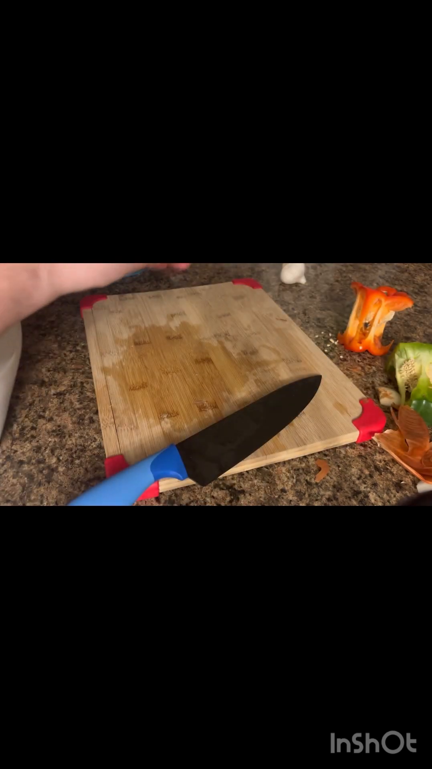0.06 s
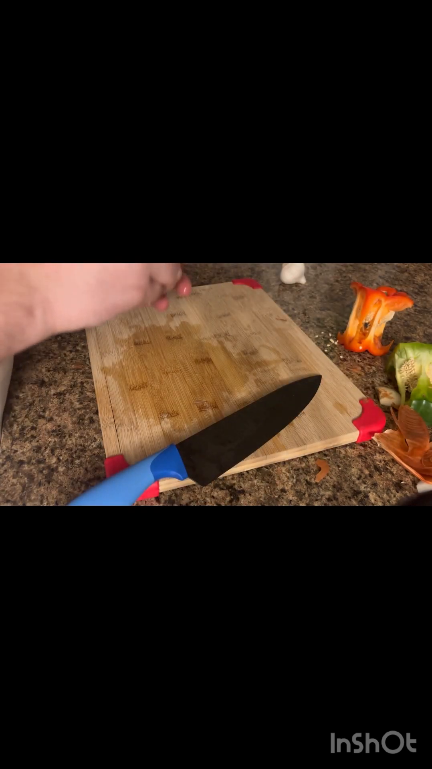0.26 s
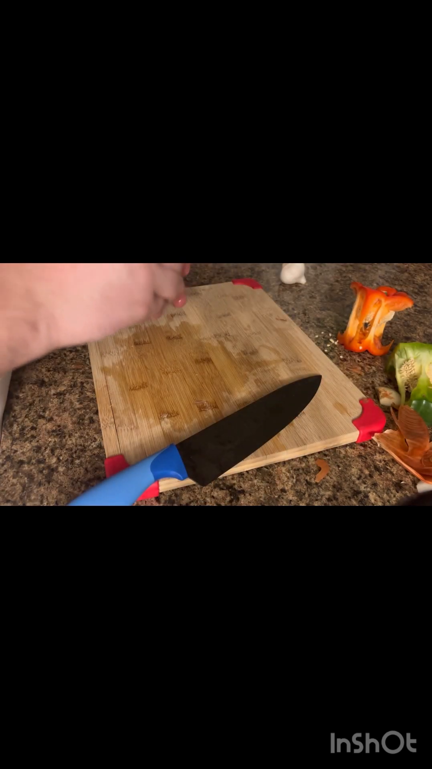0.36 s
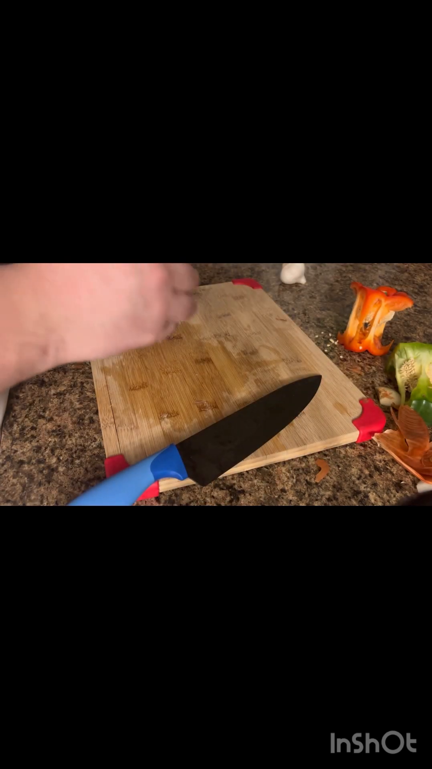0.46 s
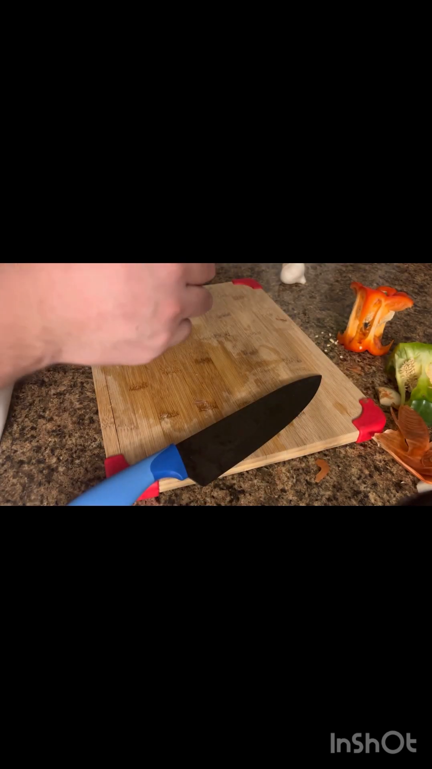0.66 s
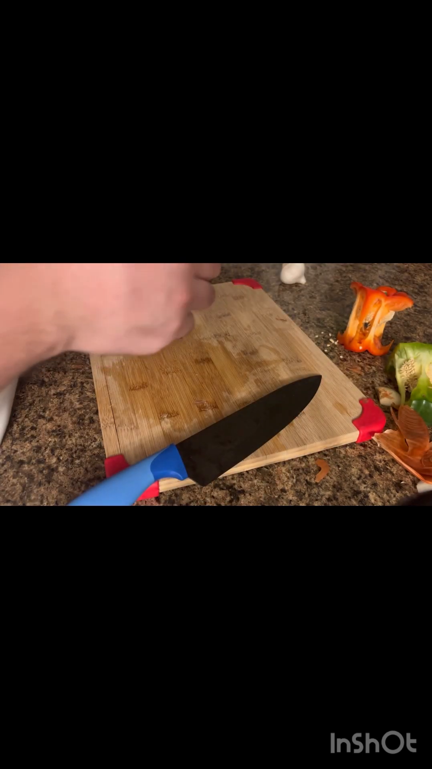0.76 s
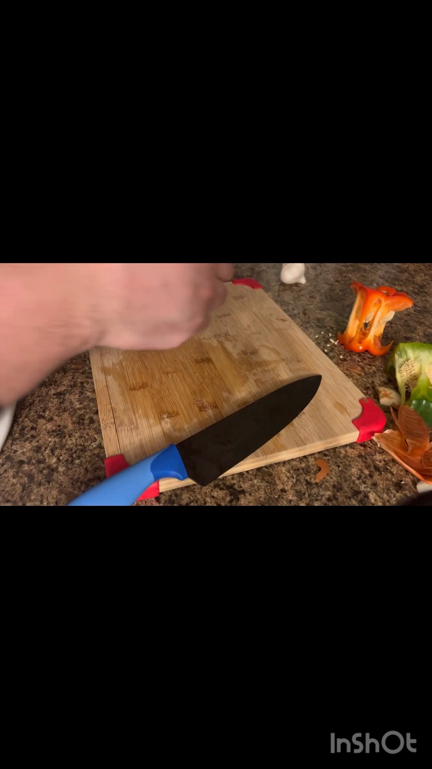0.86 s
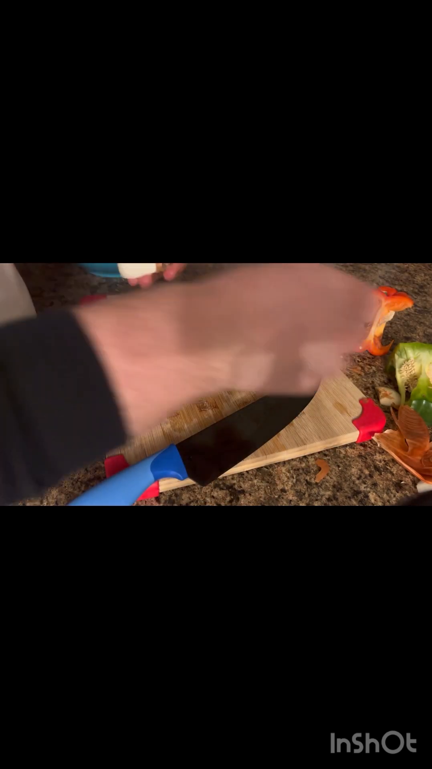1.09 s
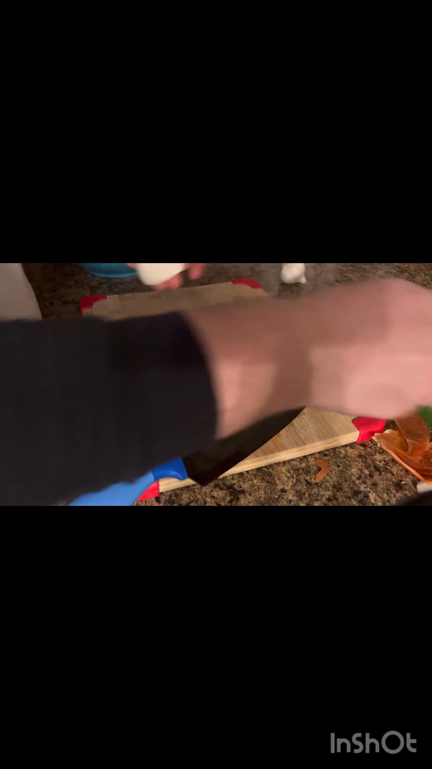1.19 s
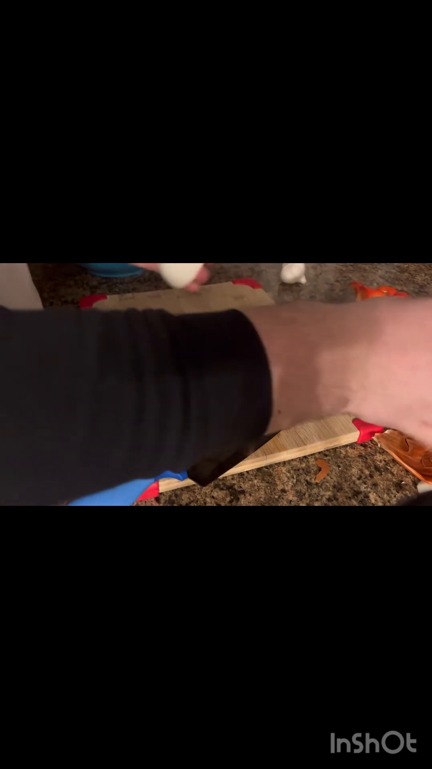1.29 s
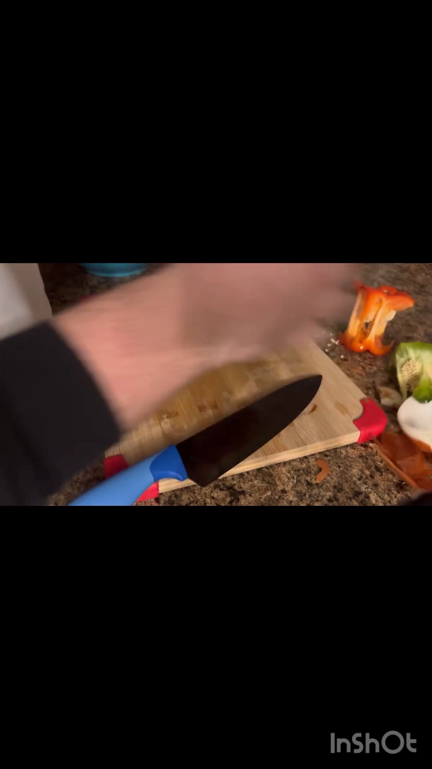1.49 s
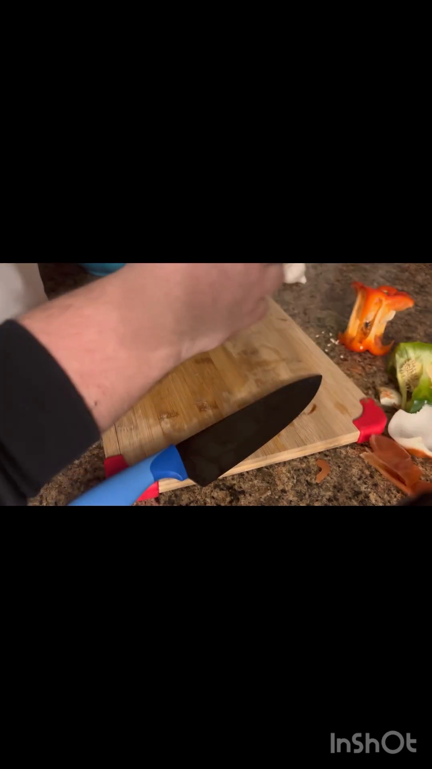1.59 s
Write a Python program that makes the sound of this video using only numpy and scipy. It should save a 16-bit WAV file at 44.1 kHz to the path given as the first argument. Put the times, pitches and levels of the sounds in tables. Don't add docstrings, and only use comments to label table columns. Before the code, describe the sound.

Papery onion skin is peeled by hand, close to a phone's stereo microphones. Faint crackles start; from 0.2 to 0.55 s loose dry skin rattles brightly, with wooden board knocks around 0.2-0.37 s. Rustling thins, snaps cluster near 0.75 s, and a sharp rip comes at 0.95 s. Smaller snaps follow, a soft palm thud at 1.3 s, and a last tick near 1.63 s over low fridge hum.

```python
import sys
import numpy as np
from scipy import signal
from scipy.fft import rfft, irfft, next_fast_len
from scipy.io import wavfile
from scipy.ndimage import uniform_filter1d, map_coordinates

SR = 44100
rng = np.random.default_rng(int(sys.argv[2]) if len(sys.argv) > 2 else 0)


def master_out(mix):
    frames = np.transpose(np.atleast_2d(mix))
    ceiling = np.clip(frames, -1, 1)
    pcm = np.round(ceiling * 32767).astype(np.int16)
    wavfile.write(sys.argv[1], SR, pcm)


def voltage_ratio(level):
    return 10 ** (np.asarray(level, float) / 20)


N = 72765

# (frequency [Hz], level [dB])
PORT_DIFFERENCE = [(100, -28), (350, -6), (1500, -8), (3000, -9), (6000, -9), (8500, -13), (12000, -18),
                   (15000, -12)]


def unit(x):
    return x / np.sqrt(np.mean(x ** 2) + 1e-20)


def along(points, hz):
    f, v = np.transpose(points)
    return np.interp(np.log(hz + 1), np.log(f + 1), v)


def wobble(rate_hz):
    knots = rng.standard_normal(int(N * rate_hz / SR) + 4)
    return map_coordinates(knots, [np.arange(N) * rate_hz / SR])


def filtered(x, response):
    m = next_fast_len(N + SR // 2)
    return irfft(rfft(x, m) * response(np.fft.rfftfreq(m, 1 / SR)), m)[..., :N]


def coloured(x, spectrum):
    gain = lambda hz: voltage_ratio(along(spectrum, hz))
    rms_gain = np.sqrt(np.mean(gain(np.linspace(0, SR / 2, 500)) ** 2))
    return filtered(x, lambda hz: gain(hz) / rms_gain)


def add(out, s, sound):
    part = out[round(s * SR):][:len(sound)]
    part += sound[:len(part)]


def ticks(rate_hz, spread_db):
    chance, sign, size = rng.random((3, N))
    return unit((chance < rate_hz / SR) * np.sign(sign - .5) * voltage_ratio(-spread_db * np.log(size + .03)))


def snapping():
    # (time [s], peak level [dB], t60 [s], lowest frequency [Hz])
    snaps = [(0.04, -59, 0.015, 5020), (0.055, -44, 0.012, 5030), (0.082, -41, 0.019, 5000),
             (0.1165, -42, 0.019, 2400), (0.1046, -44, 0.012, 5000), (0.163, -44, .01, 5030),
             (0.2268, -25, .01, 600), (.288, -41, 0.0085, 5500), (0.312, -28, 0.014, 5400),
             (0.499, -35, 0.017, 5000), (0.5303, -42, 0.012, 5960), (0.66, -43, .015, 5000),
             (0.651, -44.5, 0.08, 5030), (0.729, -43, 0.013, 2870), (.737, -38, 0.007, 6000),
             (0.741, -27.5, 0.014, 6030), (0.7534, -23, 0.0058, 5130), (0.782, -45, 0.052, 5030),
             (.762, -47, 0.014, 2800), (0.796, -36.5, 0.047, 5200), (0.8688, -34, 0.025, 7000),
             (.8785, -46, 0.012, 2580), (0.887, -35.5, 0.048, 2600), (0.9033, -38.5, 0.019, 2460),
             (0.9163, -35, 0.013, 8060), (0.922, -35, .01, 1500), (1.0916, -42, 0.0071, 6000),
             (1.0969, -31.5, 0.0042, 3030), (1.1215, -41, .01, 6000), (1.1265, -30, 0.01, 8550),
             (1.1634, -33, 0.022, 1820), (1.177, -36.5, 0.044, 4900), (1.198, -38, 0.024, 6040),
             (1.297, -38, 0.036, 700), (1.303, -37, 0.026, 6200), (1.3281, -27, 0.013, 890),
             (1.329, -37, .02, 6000), (1.3474, -35.5, 0.014, 2800), (1.3785, -35, 0.01, 1900),
             (1.396, -39, 0.014, 3980), (1.404, -39.5, 0.075, 1200), (1.627, -32, 0.012, 600)]
    # (time [s], peak level [dB])
    rip = [
        (.9532, -33),
        (.9572, -26),
        (.9594, -26),
        (.9624, -28),
        (.9660, -30),
        (.9700, -28),
        (.9730, -35),
        (.9779, -38),
        (.9841, -41),
    ]
    rip_t60_s, rip_low_hz, rip_body_hz, rip_body_db = .014, 2700, 700, 1
    rise_s, spike_db, spike_t60_s, span_ratio = 0.00037, 2.5, .004, 5.5
    events = list(snaps)
    for s, db in rip:
        events.append((s, db, rip_t60_s, rip_low_hz))
        events.append((s, db + rip_body_db, rip_t60_s, rip_body_hz))
    out, t = np.zeros(N), np.arange(SR // 10) / SR
    for s, db, t60_s, low_hz in events:
        tail = voltage_ratio(db - 60 * t / max(t60_s, .002))
        spike = voltage_ratio(db + spike_db - 60 * t / spike_t60_s)
        snap = (tail + spike) * (1 - np.exp(-t / rise_s)) * rng.standard_normal(len(t))
        band_hz = [low_hz, min(low_hz * span_ratio, SR / 2.1)]
        sos = signal.butter(2, band_hz, 'band', fs=SR, output='sos')
        add(out, s, signal.sosfilt(sos, snap))
    return out


def tearing():
    # (time [s], level [dB], length [s])
    tears = [
        (0.951, -46, 0.0032),
        (0.959, -36.5, 0.015),
        (1.331, -41.5, 0.0079),
        (1.342, -44.5, 0.0099),
        (0.306, -33.5, 0.016),
        (0.341, -36, 0.042),
        (.283, -39, .012),
    ]
    release_s = .004
    envelope, t = np.zeros(N), np.arange(SR // 10) / SR
    for s, db, length_s in tears:
        add(envelope, s, voltage_ratio(db) * np.exp(-np.clip(t - length_s, 0, 1) / release_s))
    return envelope * voltage_ratio(1.5 * wobble(300)) * ticks(3500, spread_db=2)


def crackling(effort_db):
    level_db = effort_db + 5 + 2.5 * wobble(58.87)
    burst = voltage_ratio(-60 * np.arange(200) / SR / 0.0067) * rng.standard_normal(200)
    crackle = ticks(2600, spread_db=5) * voltage_ratio(level_db)
    return np.convolve(crackle, burst / np.linalg.norm(burst))[:N]


def skin():
    # (time [s], effort level [dB])
    peeling = [(0, -74.5), (.04, -64.5), (.27, -53.5), (.31, -53.5), (.385, -58), (.4, -50), (.56, -54.5),
               (.6, -68.5), (.72, -62), (.75, -56), (.86, -62.5), (.88, -54.5), (1.0, -54.5), (1.07, -67),
               (1.19, -61), (1.28, -75.5), (1.38, -57.5), (1.56, -65)]
    # (frequency [Hz], level [dB])
    paper_colour = [(500, -2.5), (1000, -3), (2200, -4), (4000, -3.5), (5500, -10.5), (8000, 0.5),
                    (11000, -5), (15000, -2)]
    # (frequency [Hz], level [dB])
    rub_colour = [(700, 10), (2500, -3), (5500, -2.5), (8000, -1), (15000, -7)]
    let_go_s, let_go_db_per_s = 1.57, 299
    now = np.arange(N) / SR
    effort_db = np.interp(now, *np.transpose(peeling)) - let_go_db_per_s * np.clip(now - let_go_s, 0, 1)
    breaking = snapping() + tearing() + crackling(effort_db)
    rub = voltage_ratio(effort_db + 2 + 5.5 * wobble(25.29)) * rng.standard_normal(N)
    return coloured(breaking, paper_colour) + coloured(rub, rub_colour)


def shiver(clicks):
    loose_s, level_db, t60_s, centre_hz, width_hz = .26, -21, .05, 2250, 700
    envelope, t = np.zeros(N), np.arange(SR // 5) / SR
    for s, db, *_ in clicks:
        add(envelope, s, (s > loose_s) * voltage_ratio(db + level_db - 60 * t / t60_s))
    shell = lambda f: 1j * f * width_hz / (centre_hz ** 2 - f * f + 1j * f * width_hz)
    return envelope * unit(filtered(ticks(1500, spread_db=0), lambda f: shell(f) ** 2))


def rattle():
    # (time [s], peak level [dB], ring frequency [Hz], upper mode level [dB], crack level [dB])
    clicks = [(.2, -33, 2060, 2, 4), (.2066, -43.5, 2160, 13, 5), (.2146, -41, 2090, -4, 1),
              (.2251, -19, 2160, 4, 4), (.231, -39, 2260, 0.5, 11), (.2337, -30.5, 2350, -3.5, 6),
              (.249, -42, 1990, -6, -7), (.2575, -36, 1990, -6, -13), (0.2672, -36, 2300, -13, -2),
              (0.286, -22.5, 2030, -13, -3.5), (.2916, -28.5, 1920, -4, 3), (0.3028, -23.5, 1960, -1, -2),
              (.3099, -16.5, 2050, -6, -5), (.32, -21.5, 2200, -3, -3.5), (0.3319, -27, 2030, -6.5, 6.5),
              (.338, -32, 2000, -1, 8), (.3482, -35, 2260, 0, 4), (0.3595, -24, 2040, -7, 0),
              (0.3659, -19.5, 2430, -20, -13), (.3708, -31, 2180, -4, -9), (0.3756, -27, 2360, -6, 5.5),
              (0.3823, -30, 2330, 8, 12), (.3977, -39, 2120, -6, -8), (0.4175, -28.5, 2200, -4, -0.5),
              (.4262, -32, 2260, -13, 0), (.4333, -24, 2100, -12, 2), (0.4402, -25.5, 2550, -10, -5.5),
              (.4461, -26, 2250, -13, -5.5), (.4564, -36, 2200, -9, -2), (0.4654, -36.5, 2330, -6, 0),
              (0.4794, -40, 2240, -17, 9), (0.486, -29, 1780, -8, -4), (0.4936, -32, 2440, -6, -3),
              (0.503, -30.5, 2520, -1, -7), (0.5104, -32.5, 2430, -6, 4), (0.535, -41, 2400, -12, -11),
              (0.556, -34, 2350, -25, -9), (.5641, -48, 2500, -7, 5)]
    # (frequency [Hz], level [dB])
    crack_colour = [(600, -32), (1400, 2.5), (2200, 0.5), (4000, 0.5), (6000, -1.5), (8000, 6), (13000, -6),
                    (16000, 3.5)]
    shell_t60_s, attack_s, upper_ratio, upper_mode_db = 0.012, 0.00057, 1.578, -1.5
    crack_level_db, crack_t60_s = -4, 0.009
    ring, crack, t = np.zeros(N), np.zeros(N), np.arange(SR // 20) / SR
    for s, db, hz, upper_db, crack_db in clicks:
        fade = voltage_ratio(db - 60 * t / shell_t60_s) * (1 - np.exp(-t / attack_s))
        drift = np.cumsum(rng.standard_normal(len(t))) * .08
        upper_hz = hz * upper_ratio * (1 + 0.074 * (rng.random() - .5))
        low = np.sin(2 * np.pi * hz * t + drift)
        upper = np.sin(2 * np.pi * (upper_hz * t + rng.random()) + 2 * drift[::-1])
        add(ring, s, fade * (low + voltage_ratio(upper_mode_db + upper_db) * upper))
        crack_fade = voltage_ratio(db + crack_level_db + crack_db - 60 * t / crack_t60_s)
        add(crack, s, crack_fade * rng.standard_normal(len(t)))
    return ring + shiver(clicks) + coloured(crack, crack_colour)


def board():
    # (time [s], level [dB], pitch factor, decay factor)
    knocks = [(0.197, -35, 0.82, 0.33), (0.21, -32, 3.26, 0.08), (0.2529, -25, 3.5, 0.039),
              (0.2579, -30, 3.35, 0.059), (.263, -34, 2.7, 0.062), (0.2694, -23, 1.0, 0.87),
              (.282, -27.5, 0.45, 0.38), (0.2828, -26, 0.94, 0.17), (.365, -37, 1, 0.47),
              (0.681, -33.5, 0.57, 0.55), (0.714, -40.5, 0.812, 0.36), (1.345, -29.5, 0.78, 0.16),
              (1.509, -46, 0.63, 0.41), (1.553, -45.5, 0.75, .4), (1.627, -32, 3.2, 0.021)]
    # (frequency [Hz], level [dB], t60 [s])
    modes = [(158.8, -2, 0.18), (156.1, -5, 0.655), (225.2, -7, 0.33), (298.7, -18, 0.26),
             (520, -14, 0.048), (730, -3, 0.037)]
    attack_s = 0.0029
    out, t = np.zeros(N), np.arange(SR) / SR
    for s, db, pitch, decay in knocks:
        ring = np.zeros(len(t))
        for hz, level_db, t60_s in modes:
            ring += voltage_ratio(level_db - 60 * t / (t60_s * decay)) * np.sin(2 * np.pi * hz * pitch * t)
        add(out, s, -voltage_ratio(db) * ring * (1 - np.exp(-t / (attack_s / pitch))))
    return out


def palm():
    land_s, level_db, start_hz, end_hz = 1.3025, -27, 222, 52
    attack_s, sag_s, hold_s, t60_s = 0.0019, .012, .013, .045
    out, t = np.zeros(N), np.arange(SR) / SR
    hz = end_hz + (start_hz - end_hz) * np.exp(-t / sag_s)
    shape = (1 - np.exp(-t / attack_s)) * voltage_ratio(level_db - 60 * np.clip(t - hold_s, 0, 1) / t60_s)
    add(out, land_s, -shape * np.sin(2 * np.pi * np.cumsum(hz) / SR))
    return out


def scatter(x):
    z = signal.stft(x, nperseg=128)[2]
    random_phase = np.exp(2j * np.pi * rng.random(z.shape))
    odd = unit(signal.istft(z * random_phase, nperseg=128)[1][:N]) * np.std(x)
    odd = filtered(odd, lambda hz: voltage_ratio(along(PORT_DIFFERENCE, hz) - 1.5))
    return np.array([x + odd, x - odd])


def room(x):
    # (frequency [Hz], t60 [s])
    decay = [(200, 0.069), (2000, 0.28), (10000, 0.029)]
    hz, t, z = signal.stft(rng.standard_normal((2, SR // 2)), SR, nperseg=256)
    tails = signal.istft(z * voltage_ratio(-60 * t / along(decay, hz)[:, None]), SR, nperseg=256)[1]
    delayed = np.pad(x, (150, 0))
    common, odd = [signal.fftconvolve(delayed, tail)[:N] / np.linalg.norm(tails[0]) for tail in tails]
    odd = filtered(odd, lambda hz: voltage_ratio(along(PORT_DIFFERENCE, hz) + 13.5))
    return voltage_ratio(-19) * np.array([common + odd, common - odd])


def kitchen():
    # (frequency [Hz], level [dB])
    rumble_colour = [(30, -54), (55, -4.5), (110, -0.5), (165, -9), (250, -6), (450, -16.5), (700, -13.5),
                     (1200, -19.5), (3500, -27.5), (5500, -40), (16000, -56)]
    rumble_db, sway_db, hum_hz, hum_db = -48.5, .9, 59.63, -49
    rumbles = []
    for _ in range(2):
        rumble = unit(coloured(rng.standard_normal(N), rumble_colour))
        rumbles.append(rumble * voltage_ratio(rumble_db + sway_db * wobble(6.52)))
    common, odd = rumbles
    odd = filtered(odd, lambda hz: voltage_ratio(along(PORT_DIFFERENCE, hz)))
    phase = 2 * np.pi * hum_hz * np.arange(N) / SR + 0.37 * wobble(4.5)
    hum = voltage_ratio(hum_db + 0.58 * wobble(8.9)) * np.sin(phase)
    return np.array([common + odd + hum, common - odd + hum])


def scene():
    paper = rattle() + skin()
    return scatter(paper) + room(paper) + board() + palm() + kitchen()


def stereo_processing(x):
    # (frequency [Hz], left over right [dB])
    lean = [(170, -0.1), (800, 4), (1550, -6.5), (2000, 3), (3600, 6), (5500, 4), (8000, -0.5)]
    # (frequency [Hz], left leads by [rad])
    lead = [(0, 0), (200, .3), (650, 2.0), (1250, 2.2), (1600, 3.4), (1750, .4), (3000, 1.1), (4600, .6),
            (7900, -3.0), (9400, -3.3), (11000, -6.15), (13000, -6.4), (14600, -9.35)]
    top_hz, side = 16100, np.array([[.5], [-.5]])

    def response(hz):
        turn = np.exp(1j * side * np.interp(hz, *np.transpose(lead)))
        return voltage_ratio(side * along(lean, hz)) * turn / (1 + (hz / top_hz) ** 80)

    return filtered(x, response)


def treble_dropouts(x):
    floor_db, loud_db, masked_db, from_hz = -104, -86, -8, 6000
    sum_difference = np.array([x[0] + x[1], x[0] - x[1]]) / 2
    hz, _, z = signal.stft(sum_difference, SR, nperseg=1024)
    power = uniform_filter1d(np.abs(z) ** 2, size=13, axis=1)
    power = uniform_filter1d(power, size=2, axis=2)
    heard = (power > voltage_ratio(loud_db) ** 2) | (power > voltage_ratio(masked_db) ** 2 * power[::-1])
    keep = (heard & (power > voltage_ratio(floor_db) ** 2)) | (hz[:, None] < from_hz)
    mid, side = signal.istft(z * keep, SR, nperseg=1024)[1][:, :N]
    return np.array([mid + side, mid - side])


def roll_off(x):
    return signal.sosfilt(signal.butter(12, 16480, fs=SR, output="sos"), x)


def record(dry):
    mix = treble_dropouts(stereo_processing(dry))
    return roll_off(mix)


dry = scene()
out = record(dry)
master_out(out)
```